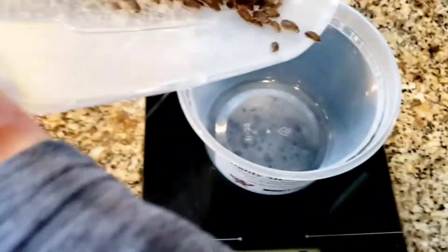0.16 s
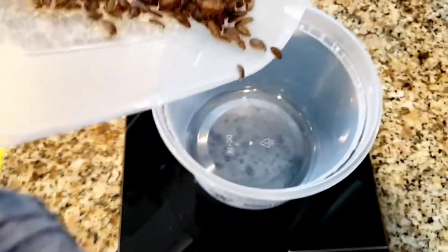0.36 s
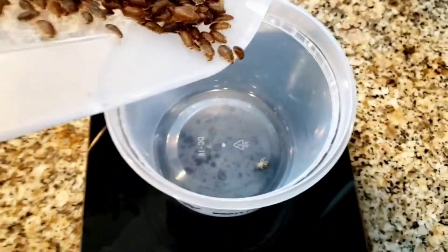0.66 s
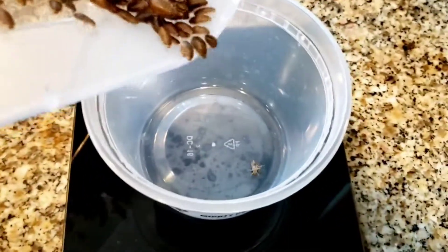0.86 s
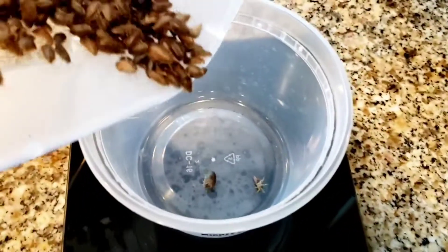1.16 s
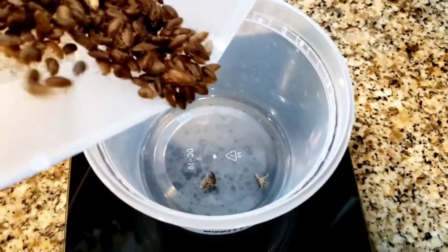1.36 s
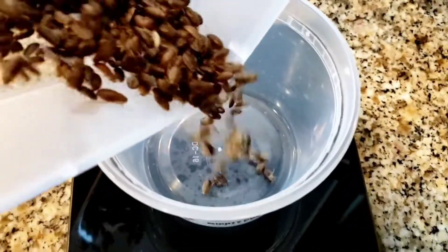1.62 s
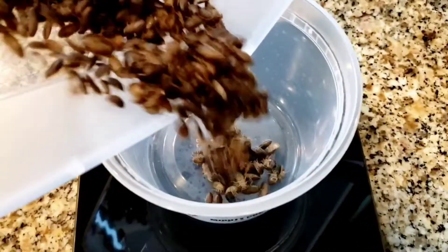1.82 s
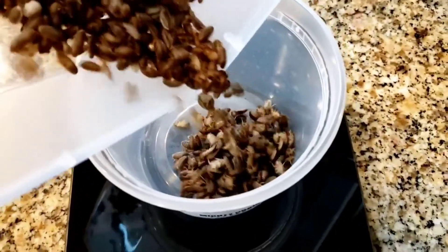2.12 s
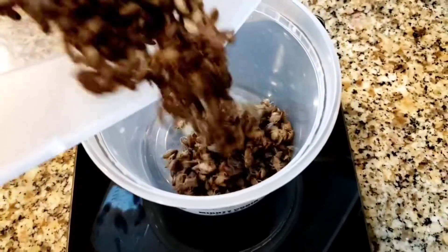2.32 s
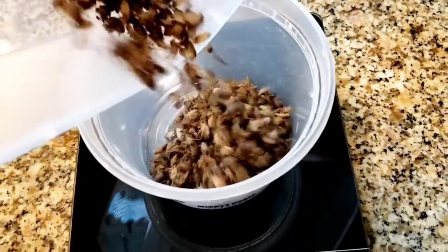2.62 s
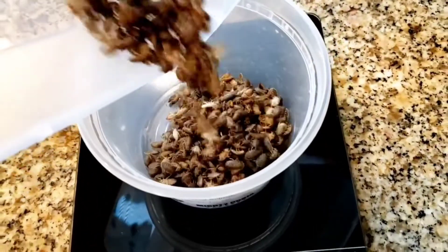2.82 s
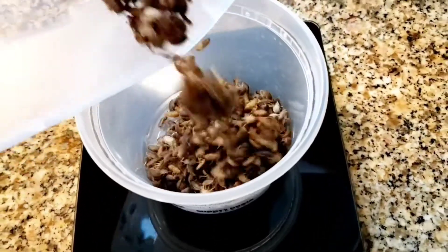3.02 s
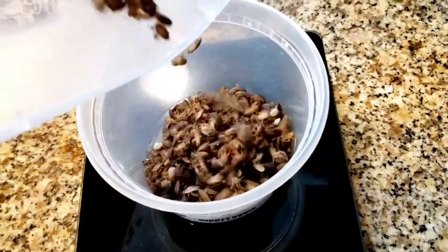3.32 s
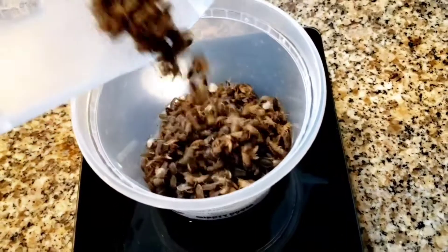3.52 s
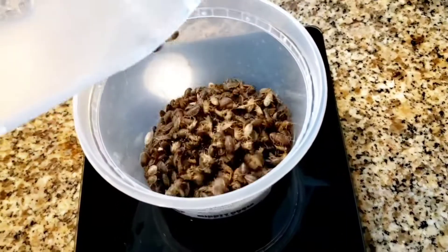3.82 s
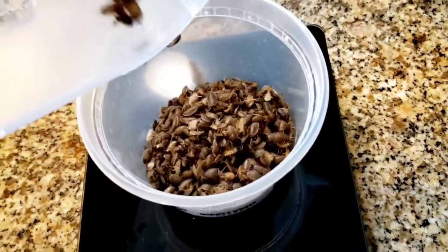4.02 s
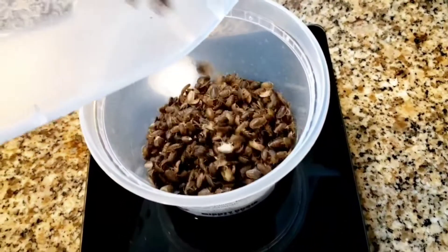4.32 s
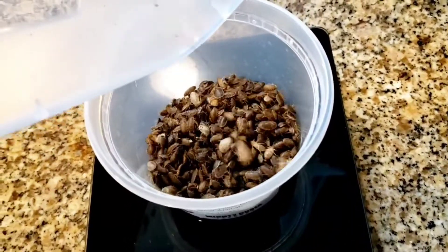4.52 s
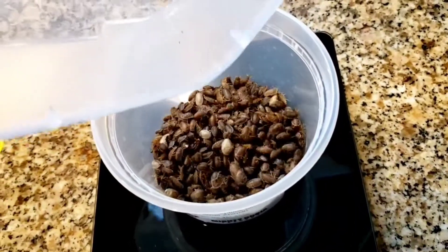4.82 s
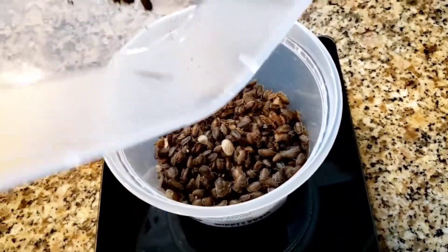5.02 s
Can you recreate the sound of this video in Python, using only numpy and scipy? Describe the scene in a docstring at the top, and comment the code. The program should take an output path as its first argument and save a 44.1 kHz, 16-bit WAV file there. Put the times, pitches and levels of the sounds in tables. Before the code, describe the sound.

Light clicks and a soft rustle of roaches poured into a plastic cup, interrupted by louder handling knocks, ending with a hollow plastic thud.

```python
"""Roaches poured into a plastic cup

Small roaches slide from a plastic tub into a thin cup on a kitchen counter. The first impacts excite
the modes of the bare cup bottom; the rest are cushioned by a rustling heap or tick against the wall.
Light taps sound on the right early on. Later, fingers knock and rub on the hand-held camera,
heard as structure-borne sound, and at the end the tub is bumped and resonates."""
import sys
import numpy as np
from scipy import signal
from scipy.fft import rfft, irfft, next_fast_len
from scipy.io import wavfile

SR = 44100
rng = np.random.default_rng(int(sys.argv[2]) if len(sys.argv) > 2 else 0)


def unload_audio(sound):
    """Save the sound as a 16-bit wav file, at the path given as the first command line argument."""
    columns = np.transpose(np.atleast_2d(sound))
    # keep every value between -1 and 1, then stretch to whole-number steps
    steps = np.round(np.clip(columns, -1, 1) * 32767)
    wavfile.write(sys.argv[1], SR, steps.astype(np.int16))


N = 227612
TIME = np.arange(N) / SR
AGE = TIME[:SR // 3]  # time since an impact [s]


# first impacts on bare plastic: (time [s], wall level [dB], bottom level [dB], bottom pitch [Hz])
FIRST_LANDINGS = [(0.543, -38, -31, 917), (1.067, -39.5, -20.5, 923), (1.5639, -35, -29, 932),
                  (1.635, -39, -39, 905), (1.6492, -28, -28.5, 976), (1.67, -29.5, -26, 870),
                  (1.683, -31.5, -35, 1040), (1.7028, -40, -31.5, 910), (1.715, -43, -33, 960),
                  (1.7572, -35, -29.5, 975), (1.773, -42, -25, 920), (1.786, -37.5, -29.5, 1000),
                  (1.859, -43.5, -54, 960), (1.879, -38.5, -36, 1117), (1.892, -39.5, -51, 910),
                  (2.058, -39, -49, 860), (2.422, -46, -66, 1040)]
# modes of the cup: (frequency [Hz], relative level [dB], T60 [s])
BOTTOM_MODES = [(554, 0, 0.025), (920, 5, 0.053), (1144, -15.5, 0.038)]
WALL_MODES = [(1944, 8.5, 0.021), (2268, 2, 0.036), (2750, 6.5, 0.016), (4300, 5.5, 0.014),
              (5550, -2, 0.02), (10000, -9, 0.012)]
WALL_SIDE_DB, BOTTOM_SIDE_DB = -4, 2.5  # left minus right

def landings():
    """Impact excitation: each body drives the modes of the cup bottom, its shell those of the wall."""
    out = np.zeros((2, N))
    for s, wall_db, bottom_db, bottom_hz in FIRST_LANDINGS:
        wall = ring(WALL_MODES, spread_db=4, detune=.04)
        bottom = ring(BOTTOM_MODES, spread_db=2.5, detune=.015, stretch=bottom_hz / BOTTOM_MODES[1][0])
        # shell and legs touch down over a few milliseconds
        touch = rng.standard_normal((2, len(AGE))) * (fade(0.023) - fade(0.00047))
        rattle = peaked(signal.fftconvolve(wall, touch, axes=1)[:, :len(AGE)])
        shell = amp(-4.5) * (peaked(wall) + rattle) + peaked(band(touch, 1350, 3180, order=1))
        add(out, s, amp(wall_db) * shell * pan(WALL_SIDE_DB))
        add(out, s, amp(bottom_db) * band(bottom, 1237, 2180, order=1) * pan(BOTTOM_SIDE_DB))
    return out


# the loudest shells striking a rim or wall: (time [s], level [dB], ring frequency [Hz])
SHELL_TICKS = [(0.5433, -40.5, 4350), (0.715, -42.5, 9100), (0.7332, -28.5, 10400), (1.564, -37, 4500),
               (1.7572, -32, 5400), (1.94, -40, 5300), (2.494, -39, 4950), (2.65, -35, 5550),
               (2.672, -38.5, 5700), (2.993, -41.5, 5760), (3.149, -31.5, 5580), (3.2252, -32, 5860),
               (3.285, -38, 5950), (3.299, -40.5, 5000), (3.691, -41, 6100), (3.805, -42.5, 5230),
               (4.26, -39, 6050), (4.646, -44, 11600), (4.7, -42.5, 4170), (4.753, -47, 3600)]

def ticks():
    """Hard contact: a shell on stiff plastic gives a broadband snap and a heavily damped ring."""
    out = np.zeros((2, N))
    for s, db, hz in SHELL_TICKS:
        snap = crack(t60=0.02, scatter=0.2)
        tick = peaked(band(snap, hz * 0.88, hz * 1.18)) + amp(3) * peaked(band(snap, 2400, 16000))
        add(out, s, amp(db) * peaked(tick) * pan(-10.5))
    return out


# clumps sliding off the lip of the tub: (start [s], duration [s], relative level [dB])
POURS = [(1.62, 0.69, -0.5), (2.25, 0.37, 4), (2.82, 0.37, 3), (3.42, 0.49, 0.5), (4.0, 0.3, -5)]
# spectra of shells and of the heap: (frequency [Hz], left level [dB], right level [dB])
SHELL_SPECTRUM = [(286, -10.5, -2.5), (1310, -2.5, -24.5), (2280, -3, -1), (3200, -12.5, -6.5),
                  (5000, -13.5, -2), (13900, 0.5, -0.5)]
HEAP_SPECTRUM = [(150, -2, -15.5), (403, -14, -2), (540, 14, 12.5), (740, -11, -3.5), (920, 4, 5),
                 (1940, -15.5, -2), (8000, -41, -5)]
POUR_START_S = POURS[0][0]
CRAWL_DB, WAKE_DB_PER_S, CALM_S = -66.5, 4.5, 0.18
SCRAPE_DB, STIR_DB, PATTER_DB, FLICK_DB = -63.5, -54.5, -58, -63.5

def swarm():
    """Incoherent summation: countless leg scratches, shell flicks and soft falls add up to a rustle."""
    flow = arches(POURS)
    # the colony crawls more busily as the tub tilts, until the pour begins
    crawl = amp(CRAWL_DB + WAKE_DB_PER_S * np.minimum(TIME - POUR_START_S, 0))
    # each slide stirs up legs, which then calm down
    pole = np.exp(-1 / (CALM_S * SR))
    stirred = signal.lfilter([1 - pole], [1, -pole], flow ** 2)
    scuttle = np.sqrt(crawl ** 2 + (amp(SCRAPE_DB) * flow) ** 2 + amp(STIR_DB) ** 2 * stirred)
    patter = amp(PATTER_DB) * np.sqrt(flow ** 2 + stirred) * cushion(db_per_s=10.5) + amp(-10) * crawl
    legs = unit(colour(grains(per_s=5100, spread_db=2.5, shared=0.23), SHELL_SPECTRUM))
    flicks = unit(colour(grains(per_s=140, spread_db=5.5, shared=0.54), SHELL_SPECTRUM))
    bodies = unit(colour(grains(per_s=550, spread_db=2, shared=1), HEAP_SPECTRUM))
    # they slide in loose clumps, so the level wavers by 1.5 dB rms
    clumps = amp(1.5 * unit(band(rng.standard_normal(N), 6, 45)))
    return clumps * (scuttle * legs + amp(FLICK_DB) * flow * flicks + patter * bodies)


def clatter():
    """Random excitation: the falling crowd rings the cup wall until the heap covers the plastic."""
    hits = scattered(WALL_MODES, per_s=220, spread_db=2.5, count=24)
    return amp(-57) * hits * arches(POURS) * cushion(db_per_s=19) * pan(WALL_SIDE_DB)


def cushion(db_per_s):
    """Cushioning: the growing heap softens impacts, so their gain falls from the first slide on."""
    return amp(-db_per_s * np.maximum(TIME - POUR_START_S, 0))


# light taps on the right, then heavier knocks on the camera at left: (time [s], knock level [dB],
# thump level [dB], thump frequency [Hz], contact cutoff [Hz], mode tuning [ratio])
TAPS_AND_KNOCKS = [(0.2788, -55.5, -87, 140, 830, 1.04), (0.366, -52, -78, 140, 900, 1.33),
                   (0.43, -46.5, -83, 140, 795, 1.15), (0.7442, -27, -77, 140, 5050, 1.24),
                   (0.754, -38.5, -63, 140, 2500, 1.1), (1.749, -39.5, -36.5, 137, 445, 1.03),
                   (2.082, -16.5, -19.5, 139.5, 1970, 1), (3.732, -22, -31.5, 90, 1500, 0.95),
                   (3.7457, -37, -28, 206, 1400, 0.28), (3.815, -35, -36, 150, 1000, 0.84),
                   (3.9052, -13.5, -26.5, 88, 2030, .96), (4.0334, -9, -25.5, 84.5, 4270, 0.95),
                   (4.1376, -18.5, -26, 106, 6470, 1.054), (4.251, -32, -28, 133, 750, 1.16)]
# modes rung by a tap or knock: (frequency [Hz], relative level [dB], T60 [s])
KNOCK_MODES = [(288, 3, 0.098), (374, 9, 0.03), (519.6, 13, 0.042), (960, 1, 0.036), (1312, 5, 0.017)]
EARLY_TAP_SIDE_DB, KNOCK_SIDE_DB, TAPS_END_S = -9.5, 11.5, 0.75

def knocks():
    """Impulse response: each tap or knock is a pulse, a brief ring and a low rocking thump."""
    out = np.zeros((2, N))
    for s, knock_db, thump_db, thump_hz, contact_hz, stretch in TAPS_AND_KNOCKS:
        side_db = EARLY_TAP_SIDE_DB if s < TAPS_END_S else KNOCK_SIDE_DB
        body = ring(KNOCK_MODES, spread_db=2, detune=.03, stretch=stretch)
        contact = band(crack(t60=0.039, scatter=0.019), 100, 3100, order=1)
        # a soft contact spreads the push over time; a hard one keeps it sharp
        push = peaked(band(contact, 71, contact_hz, order=3))
        # the rocking, and a faster twist, are damped within a few cycles
        phase = 2 * np.pi * thump_hz * AGE
        rocking = fade(9.1 / thump_hz) * np.sin(phase)
        twist = amp(-6) * fade(7 / thump_hz) * np.sin(1.463 * phase)
        # the push goes mostly to the nearer microphone, the ring reaches both
        add(out, s, -amp(knock_db) * push * pan(side_db * 2.07))
        add(out, s, -amp(knock_db - 1.5) * band(body, 320, contact_hz) * pan(side_db))
        add(out, s, -amp(thump_db) * band(rocking + twist, thump_hz, thump_hz * 3) * pan(side_db))
    # bending waves take 0.8 ms to cross the camera case
    return np.array([out[0], np.interp(TIME - .0008, TIME, out[1])])


# the tub is bumped and rebounds: (time [s], relative level [dB])
TUB_BUMPS = [(5.0582, -12.5), (5.079, -21.5)]
# modes of the tub: (frequency [Hz], relative level [dB], T60 [s])
TUB_MODES = [(137, 7.5, 0.18), (262, 8.5, 0.092), (438.5, 11, 0.067), (556, 11, 0.058), (662, 6.5, 0.048),
             (960, 8, 0.033)]

def bumps():
    """Free vibration: the big hollow tub booms in its low modes, with a dry clack at first contact."""
    out = np.zeros((2, N))
    for s, db in TUB_BUMPS:
        boom = ring(TUB_MODES, spread_db=2, detune=.003)
        add(out, s, amp(db + 4) * band(boom, 100, 1100) * pan(-3.4))
    s, db = TUB_BUMPS[0]
    clack = peaked(band(crack(t60=0.037, scatter=0.25), 670, 1940, order=1))
    add(out, s, amp(db - 6.5) * clack * pan(-10))
    return out


# short rubs and scrapes, the last a hiss and low judder trailing the tub bump:
# (start [s], duration [s], hiss level [dB], judder level [dB])
SCRAPES = [(1.028, 0.058, -67, -63.5), (2.257, 0.099, -59.5, -55), (3.112, 0.06, -57.5, -65),
           (3.291, 0.037, -58, -54.5), (3.439, 0.025, -55.5, -49), (3.445, 0.1, -45, -74),
           (3.529, 0.15, -58.5, -91), (5.074, 0.12, -56, -38)]
# spectrum of contact noise: (frequency [Hz], left level [dB], right level [dB])
CONTACT_SPECTRUM = [(200, -7, -12.5), (1090, -5, -12.5), (2500, -13, -35), (8000, -20, -29),
                    (15000, -23.5, -23.5)]
# modes rung as a rub catches: (frequency [Hz], relative level [dB], T60 [s])
CATCH_MODES = [(1000, 0.5, 0.004), (1520, 1, 0.016), (3000, -1, 0.017)]
DRAG_DELAY_S, DRAG_S, DRAG_DB, DRAG_DB_PER_DB = 0.0077, 0.071, -36.5, 1.28

def rubs():
    """Stick-slip friction: rubs and scrapes give a hiss, small ringing catches and a low judder."""
    strokes = [(s, length, db) for s, length, db, _ in SCRAPES]
    # a brief drag follows each tap or knock, louder after a harder one
    drags = [(s + DRAG_DELAY_S, DRAG_S, DRAG_DB + DRAG_DB_PER_DB * db) for s, db, *_ in TAPS_AND_KNOCKS]
    judder = arches((s, length, db) for s, length, _, db in SCRAPES)
    slips = unit(band(rng.standard_normal(N), 106, 173))
    hiss = unit(colour(grains(per_s=5500, spread_db=-2.5, shared=0.58), CONTACT_SPECTRUM))
    catches = amp(-5) * scattered(CATCH_MODES, per_s=400, spread_db=6) * pan(12)
    return arches(strokes + drags) * (hiss + catches) + judder * slips


# the camera case rattles after the harder knocks: (time [s], level before filtering [dB])
CASE_RATTLES = [(3.744, -7), (3.775, -21), (3.815, -27), (3.964, -28), (4.074, -26), (4.0918, -27),
                (4.183, -12.5)]

def rattles():
    """Secondary impacts: the camera case settles with small, dry, unpitched clicks."""
    out = np.zeros((2, N))
    for s, db in CASE_RATTLES:
        add(out, s, amp(db) * crack(t60=0.012, scatter=0.3))
    return colour(out, CONTACT_SPECTRUM)


def crackle():
    """Narrow-band impulse noise: a faint crackle on the left as the tub starts to tilt."""
    rustle = unit(band(grains(per_s=250, spread_db=5, shared=0.5), 1850, 2370))
    return arches([(0.03, 0.17, -72.5)]) * rustle * pan(23)


# the hand holding the camera sways: (start [s], duration [s], level [dB])
HAND_SWAYS = [(0.3, 1.68, -73), (1.55, 1.26, -66), (3.4, 1.09, -63), (4.62, 0.23, -64)]
# spectra of rumble and of steady noise: (frequency [Hz], left level [dB], right level [dB])
RUMBLE_SPECTRUM = [(71.9, -7, -3), (140, 2.5, 6.5), (299, 2, 9), (597, -4, -4.5), (900, -35, -6),
                   (5000, -46.5, -28)]
NOISE_FLOOR = [(22.8, -87.5, -79), (203, -94, -58), (900, -73, -80), (1650, -67.5, -61), (2090, -56.5, -91),
               (2198, -51.5, -83), (2500, -63.5, -86), (3200, -75, -75), (4900, -76.5, -70.5),
               (15000, -75, -89)]
STILL_HAND_DB = -77

def background():
    """Handling noise: hand motion rumbles over a hiss that peaks at a different pitch on each side."""
    rumble = unit(colour(grains(per_s=1700, spread_db=2.5, shared=3.7), RUMBLE_SPECTRUM))
    hiss = colour(rng.standard_normal((2, N)), NOISE_FLOOR)
    return np.hypot(amp(STILL_HAND_DB), arches(HAND_SWAYS)) * rumble + hiss


# reverberation time of the kitchen: (frequency [Hz], T60 [s])
KITCHEN_DECAY = [(100, 0.47), (500, 0.4), (2000, 0.26), (9000, 0.15)]

def kitchen(x):
    """Reverberation: dense reflections from counter and walls decay exponentially, the treble first."""
    hz, t, noise = signal.stft(rng.standard_normal((2, SR // 2)), SR, nperseg=256)
    t60 = log_interp(hz, *np.transpose(KITCHEN_DECAY))[:, None]
    tail = signal.istft(noise * np.exp(-np.log(1000) * t / t60), SR, nperseg=256)[1]
    tail *= np.minimum(np.arange(tail.shape[1]) / SR / 0.0029, 1)  # 2.9 ms build-up
    return signal.fftconvolve(x, tail / np.linalg.norm(tail[0]), axes=1)[:, :N]


def ring(modes, spread_db, detune, stretch=1):
    """Modal superposition: tuning varies with the spot hit, weight and phase also with the microphone."""
    out = np.zeros((2, len(AGE)))
    for hz, db, t60 in modes:
        weight, offset = rng.uniform(-1, 1, (2, 2, 1))
        tuned_hz = hz * stretch * rng.uniform(1 - detune, 1 + detune)
        out += amp(db + spread_db * weight) * fade(t60) * np.sin(2 * np.pi * tuned_hz * AGE + .6 * offset)
    return out / abs(out).max(1).mean()


def scattered(modes, per_s, spread_db, count=8):
    """Poisson impacts on several spots of one object, each spot with its own tuning."""
    spots = [ring(modes, spread_db=5, detune=.14)[:, :SR // 20] for _ in range(count)]
    struck = rng.random(N) < per_s / SR
    size = np.minimum(rng.exponential(1, N), 4)
    spot = rng.integers(count, size=N)
    out = np.zeros((2, N))
    for at in np.flatnonzero(struck):
        add(out, at / SR, amp(spread_db * size[at]) * spots[spot[at]])
    return unit(out)


def grains(per_s, spread_db, shared):
    """Shot noise: tiny impulses of random size, partly common to both microphones."""
    size = amp(spread_db * np.minimum(rng.exponential(1, (3, N)), 4)) * rng.choice([-1, 1], (3, N))
    clicks = size * (rng.random((3, N)) < per_s / SR)
    return unit(clicks[:2] + shared * clicks[2])


def crack(t60, scatter):
    """A contact impulse trailed by decaying noise."""
    return (AGE == 0) + scatter * rng.standard_normal((2, len(AGE))) * fade(t60)


def fade(t60):
    """Exponential decay by 60 dB in t60 seconds."""
    return np.exp(-np.log(1000) * AGE / t60)


def arches(rows):
    """Sum of half-sine envelopes: (start [s], duration [s], level [dB])."""
    return sum(amp(db) * np.sin(np.pi * np.clip((TIME - s) / length, 0, 1)) for s, length, db in rows)


def colour(x, spectrum):
    """Zero-phase stereo filter: (frequency [Hz], left gain [dB], right gain [dB])."""
    points_hz, *sides = np.transpose(spectrum)
    size = next_fast_len(N + len(AGE), True)
    hz = np.fft.rfftfreq(size, 1 / SR)
    gains = amp([log_interp(hz, points_hz, side) for side in sides])
    return irfft(rfft(x, size) * gains, size)[:, :N]


def band(x, low_hz, high_hz, order=2):
    """Causal band-pass."""
    sos = signal.butter(order, [low_hz, min(high_hz, SR / 2 - 1)], "band", fs=SR, output="sos")
    return signal.sosfilt(sos, x)


def log_interp(hz, points_hz, values):
    """Interpolation on a log-frequency axis."""
    return np.interp(np.log(hz + 1), np.log(points_hz), values)


def pan(db):
    """Stereo gains with a mean of one for a left-minus-right level difference."""
    gains = amp([[db / 2], [-db / 2]])
    return gains / gains.mean()


def add(mix, s, sound):
    """Superposes a stereo sound at time s."""
    part = mix[:, round(s * SR):][:, :sound.shape[-1]]
    part += sound[..., :part.shape[-1]]


def amp(db):
    """Decibels to gain."""
    return 10 ** (np.asarray(db) / 20)


def unit(x):
    """Scales to an rms of one."""
    return x / np.sqrt(np.mean(x ** 2) + 1e-20)


def peaked(x):
    """Scales to a peak of one."""
    return x / abs(x).max()


def scene():
    """Direct plus reverberant field: cup and tub fill the room; taps and knocks stay almost dry."""
    cup, rim, tub, taps = landings() + clatter(), ticks(), bumps(), knocks()
    wet = kitchen(amp(-9.5) * cup + amp(-11) * rim + amp(-14.5) * tub + amp(-27) * taps)
    return cup + rim + tub + taps + wet + rattles() + rubs() + swarm() + crackle() + background()


# response of the two microphone ports: (frequency [Hz], left gain [dB], right gain [dB])
PORT_RESPONSE = [(1098, 0, 1), (1500, -5, -8), (2040, 3, 2.5), (3140, -3.5, -1), (4500, -1, 4),
                 (6030, -3, 3), (7370, -2, -8.5), (9930, -13.5, -4), (10650, -13, -8), (12230, -20, -2.5),
                 (15370, -29, -18)]
BASS_CUT_HZ, BAND_LIMIT_HZ = 52, 15800

def record(dry):
    """Port resonance colours each microphone differently; the recorder then limits the bandwidth."""
    bass_cut = signal.butter(3, BASS_CUT_HZ, "high", fs=SR, output="sos")
    low_pass = signal.firwin(511, BAND_LIMIT_HZ, window=("kaiser", 9), fs=SR)
    heard = signal.sosfilt(bass_cut, colour(dry, PORT_RESPONSE))
    return signal.oaconvolve(heard, low_pass[None], "same")


dry = scene()
out = record(dry)
unload_audio(out)
```